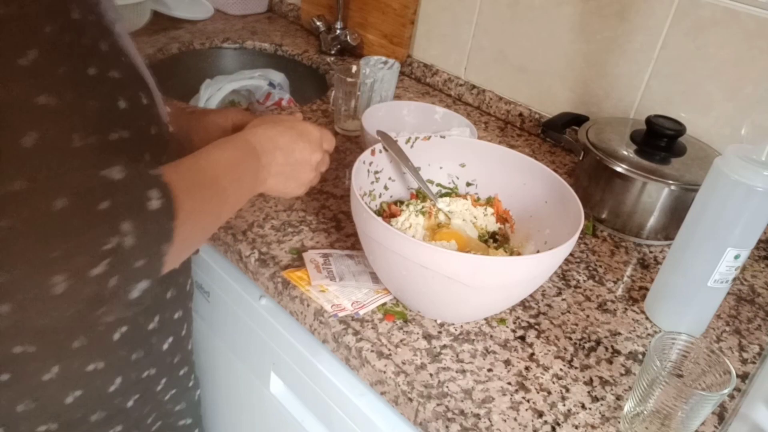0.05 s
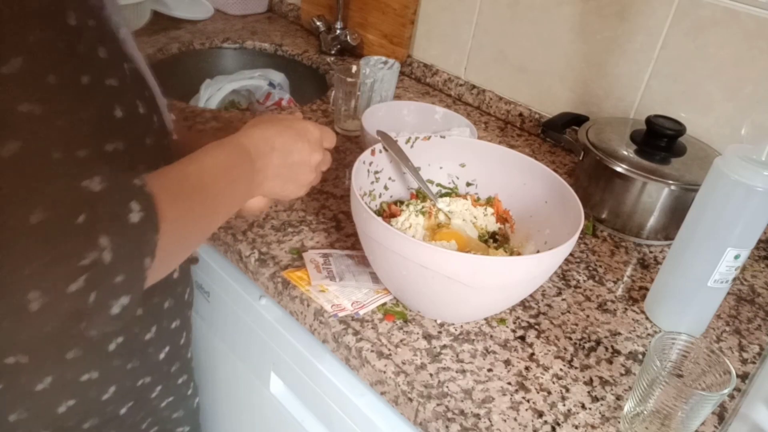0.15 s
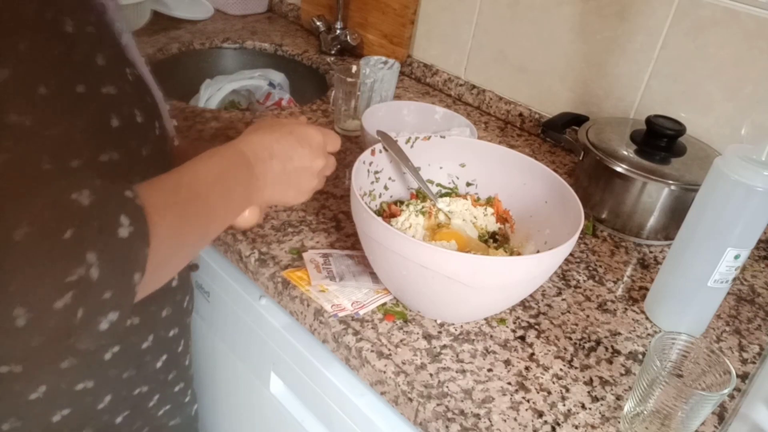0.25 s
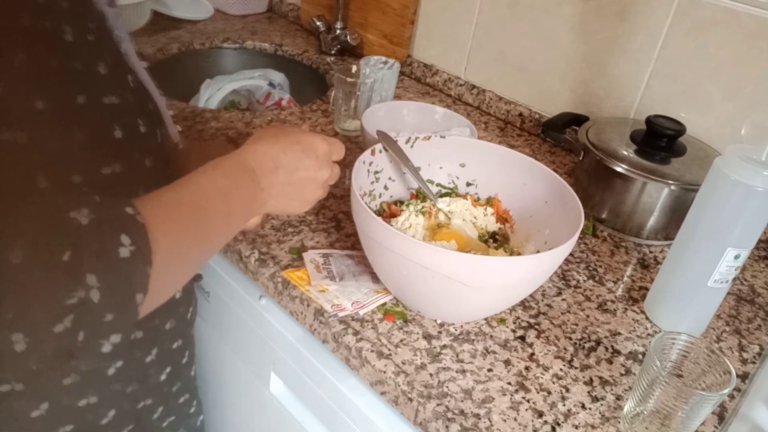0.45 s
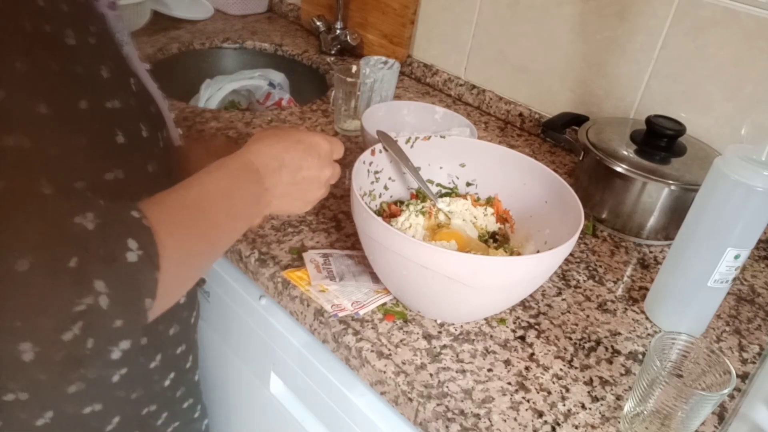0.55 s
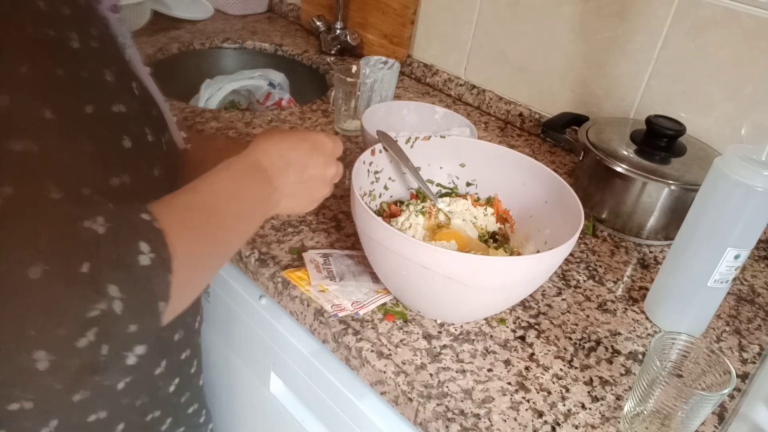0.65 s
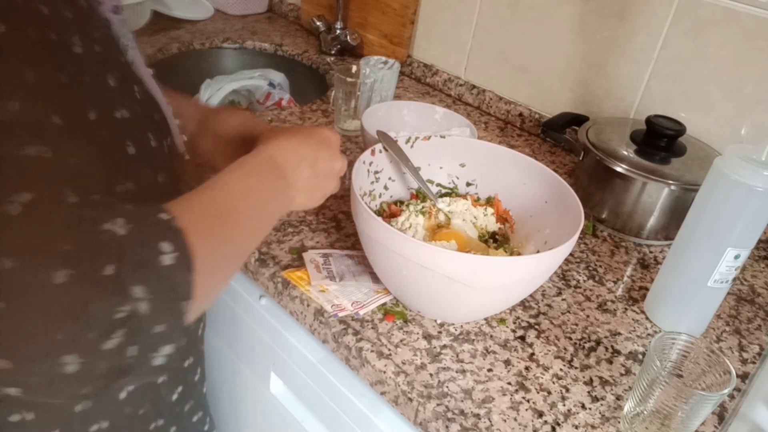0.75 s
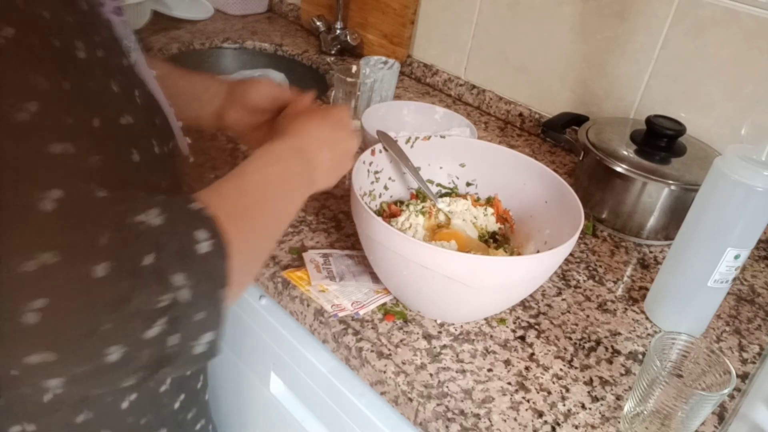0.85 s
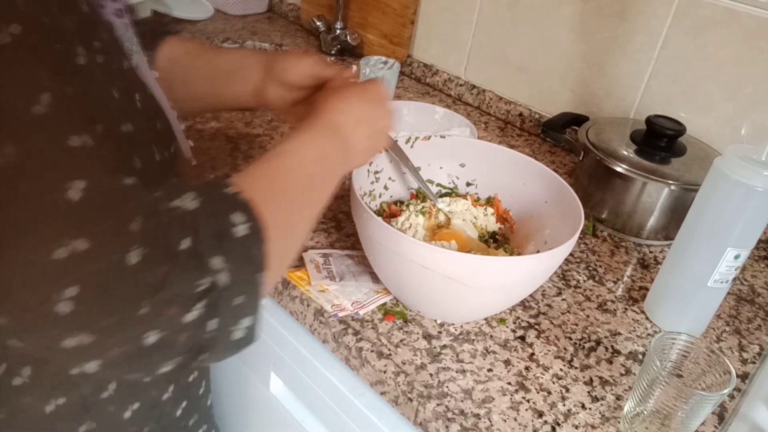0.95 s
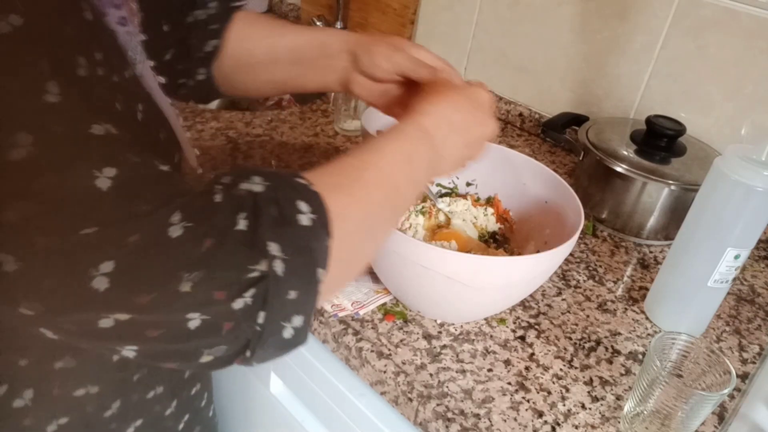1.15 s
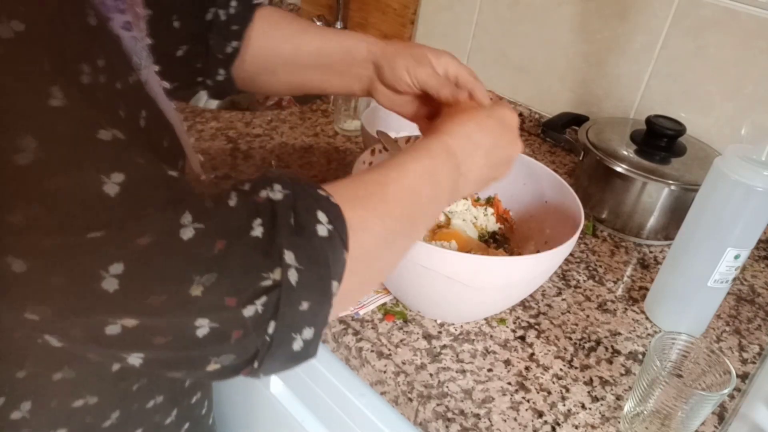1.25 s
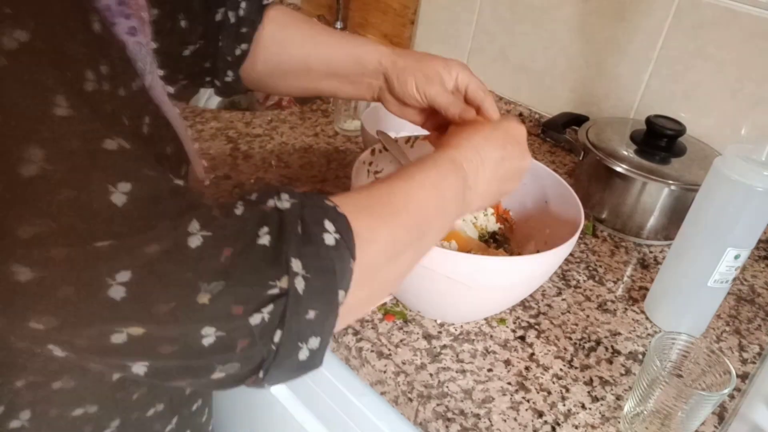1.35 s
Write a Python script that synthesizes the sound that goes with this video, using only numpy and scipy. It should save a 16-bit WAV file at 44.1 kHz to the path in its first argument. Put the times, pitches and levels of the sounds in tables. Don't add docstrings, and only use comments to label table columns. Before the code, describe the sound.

An egg creaks softly in the hand, then is knocked twice on a stone counter, crunching sharply with a short thud; faint shell clicks follow. Close microphone, small reflective tiled kitchen, faint hiss and hum.

```python
import sys
import numpy as np
from scipy import signal
from scipy.io import wavfile

SR = 44100
rng = np.random.default_rng(int(sys.argv[2]) if len(sys.argv) > 2 else 0)


def natural_amplitude(level_db):
    exponent = np.asarray(level_db, float) / 20
    return 10 ** exponent


def to_wav(sig):
    pcm = np.clip(np.atleast_2d(sig), -1, 1) * 32767
    pcm = np.round(pcm).astype(np.int16)
    wavfile.write(sys.argv[1], SR, pcm.T)


N = 61739
LEAD = 4410


def at_hz(points, hz):
    table_hz, values = np.array(points).T
    return np.interp(np.log(hz), np.log(table_hz), values)


def rms_one(x):
    return x / np.sqrt(np.mean(x ** 2) + 1e-30)


def band(x, low_hz, high_hz):
    sos = signal.butter(2, [low_hz, min(high_hz, .45 * SR)], "band", fs=SR, output="sos")
    return signal.sosfilt(sos, np.asarray(x) + 1e-18)


def bands():
    edges = 30 * 2 ** (np.arange(29) / 3)
    return [(low, high, np.sqrt(low * high)) for low, high in zip(edges, edges[1:])]


def drift(rate_hz):
    r = np.exp(-2 * np.pi * rate_hz / SR)
    noise = rng.standard_normal(N + LEAD + SR)
    return rms_one(signal.lfilter([1], [1, -2 * r, r * r], noise)[SR:])


def ring(clicks, hz, t60):
    r = natural_amplitude(-60 / (t60 * SR))
    w = 2 * np.pi * hz / SR
    return signal.lfilter([0, np.sin(w)], [1, -2 * r * np.cos(w), r * r], clicks + 1e-18)


def grains(start_s, length_s, per_s, spread_db):
    t = (np.arange(N + LEAD) - LEAD) / SR - start_s
    draw = rng.random(len(t))
    size = np.minimum(rng.exponential(1, len(t)), 3)
    sign = rng.choice([-1, 1], len(t))
    fade = (t >= 0) * np.exp(-np.maximum(t, 0) / length_s)
    run = (draw < per_s / SR) * sign * natural_amplitude(spread_db * size) * fade
    run[np.argmax(t >= 0)] = natural_amplitude(5)
    return run


# frequency in Hz, level in dB per Hz.
AIR_TONE = [(40, 6.5), (90, -2.5), (220, 3), (600, -1.5), (1440, -6.5), (3000, -15.5), (7000, -22.5),
            (15500, -30.5)]
AIR_DB, AIR_FLICKER_DB = -62, 1.78
HUM_HZ, HUM_WIDTH_HZ, HUM_DB = 101.3, 30, -71


def air():
    white = rng.standard_normal((3, N + LEAD))
    together = drift(2.4)
    hiss = 0
    for k, (low, high, hz) in enumerate(bands()):
        flicker_db = AIR_FLICKER_DB * (0.78 * together + drift(25.0))
        hiss = hiss + natural_amplitude(at_hz(AIR_TONE, hz) + flicker_db) * band(white[k % 2], low, high)
    hum = band(white[2], HUM_HZ - HUM_WIDTH_HZ / 2, HUM_HZ + HUM_WIDTH_HZ / 2)
    return natural_amplitude(AIR_DB) * rms_one(hiss) + natural_amplitude(HUM_DB) * rms_one(hum)


# start in
# seconds, level in dB, centre frequency in Hz, length in seconds.
CREAKS = [(-.03, -39.5, 2600, 0.07), (-.06, -33.5, 424, 0.05), (-.02, -50.5, 7800, 0.1),
          (-.02, -59.5, 14300, 0.13), (.118, -40.5, 2400, 0.033), (0.6268, -45, 7800, 0.018),
          (0.63, -43, 2770, 0.0084), (0.634, -53, 14100, 0.007), (0.76, -65, 13600, 0.0089),
          (0.865, -65, 14600, 0.012), (1.077, -45.5, 5160, 0.0023), (1.093, -57, 13000, 0.016),
          (1.095, -51.5, 7100, 0.022), (1.1786, -48.5, 7400, 0.0054), (1.179, -58, 13200, .004),
          (1.184, -43, 4350, 0.0037), (1.301, -56, 7500, .006), (1.368, -43.5, 4500, 0.011),
          (1.37, -50, 8700, 0.027), (1.376, -42, 4850, .005), (1.391, -25.5, 407, 0.0012),
          (-.05, -42, 1255, 0.17), (.627, -44.5, 5130, 0.012), (.628, -40.5, 1470, 0.016),
          (1.08, -49, 2400, 0.023), (1.18, -49, 4800, 0.0016), (1.369, -61, 14700, .04),
          (.28, -28, 89, 0.09), (0.931, -68, 8250, 0.3)]
CREAK_CLICKS_PER_S, CREAK_SPREAD_DB, CREAK_WIDTH_OCT = 2500, 3, .35


def creaks():
    width = 2 ** CREAK_WIDTH_OCT
    total = 0
    for start_s, db, hz, length_s in CREAKS:
        clicks = grains(start_s, length_s, CREAK_CLICKS_PER_S, CREAK_SPREAD_DB)
        total = total + natural_amplitude(db + 2.5) * band(clicks, hz / width, hz * width)
    return total


# start in seconds, level in dB.
FIRST_FRACTURES = [
    (.2373, -18),
    (.2388, -17),
    (.2412, -25.5),
    (.2428, -17.5),
    (.249, -20),
]
SECOND_FRACTURES = [
    (.4173, -37),
    (.4192, -16),
    (.4214, -17),
    (.4248, -15.5),
    (.4335, -43),
    (.4365, -21.5),
]
# frequency in Hz, level in dB per Hz.
FIRST_TONE = [(60, -37), (120, -1), (400, 0), (900, -3), (1500, -1), (3400, -6), (8000, -7.5), (15500, -24)]
SECOND_TONE = [(60, -35), (150, 1.5), (350, -2), (650, -9), (1300, -4.5), (4000, -12.5), (8000, -4.5),
               (15500, -15.5)]
# frequency in Hz, level in dB, t60 in seconds.
FIRST_MODES = [(116, -37, 0.5), (151, -26.5, 0.041), (385.8, -21.5, 0.13), (578, -25.5, 0.06),
               (800, -19.5, 0.029), (1313, -23, 0.11), (1507, -24, 0.076), (2110, -36, 0.056),
               (2700, -20, 0.042), (3210, -23.5, 0.073), (3650, -30.5, .08), (6640, -22.5, 0.023),
               (8440, -20, 0.0094)]
SECOND_MODES = [(116, -33, 0.12), (214.5, -27.5, 0.073), (402, -31, 0.18), (543, -35.5, 0.064),
                (805, -36, 0.078), (1266, -22.5, 0.1), (2115, -29.5, 0.042), (2400, -30, 0.045),
                (2790, -34, 0.05), (3566, -36.5, 0.09), (7800, -20.5, 0.0057), (9800, -55, .006)]
GRIT_PER_S, GRIT_DB, GRIT_S = 2100, -8, 0.011
THUD_LAG_S, THUD_BELOW_HZ, SHELL_ABOVE_HZ = 0.00469, 300, 5000
BLOW_TO_ROOM_DB = 4


def knock(fractures, tone, modes):
    clicks, blow = np.zeros((2, N + LEAD))
    for k, (start_s, db) in enumerate(fractures):
        clicks[LEAD + int(start_s * SR)] = natural_amplitude(db) * (-1) ** k
    first_s = fractures[0][0]
    top_db = max(db for _, db in fractures)
    blow[LEAD + int(first_s * SR)] = natural_amplitude(top_db)
    grit = grains(first_s + 0.00072, GRIT_S, GRIT_PER_S, 3.3)
    crunch = clicks + natural_amplitude(top_db + GRIT_DB) * grit

    broad = 0
    for k, (low, high, hz) in enumerate(bands()):
        broad = broad + natural_amplitude(at_hz(tone, hz) + 9.5) * band([crunch, blow], low, high) * (-1) ** k

    late_blow = np.roll(blow, int(THUD_LAG_S * SR))
    rings = 0
    for hz, db, t60 in modes:
        if hz < THUD_BELOW_HZ:
            striker = late_blow
        elif hz < SHELL_ABOVE_HZ:
            striker = blow
        else:
            striker = clicks
        rings = rings + natural_amplitude(db + 7) * ring(striker, hz, t60)
    return np.array([broad[0] + rings, natural_amplitude(BLOW_TO_ROOM_DB) * broad[1]])


# frequency in Hz, t60 in seconds.
TILE_T60 = [(100, 0.41), (220, 0.37), (450, 0.45), (900, .32), (1800, 0.33), (3880, .28), (8000, 0.23),
            (14000, 0.18)]
ROOM_DB, ROOM_BUILD_S, ROOM_BUILD_CYCLES = -23.5, 0.0045, 2.5


def kitchen(x):
    t = np.arange(SR // 2) / SR
    white = rng.standard_normal((2, len(t)))
    echo = 0
    for k, (low, high, hz) in enumerate(bands()):
        build = 1 - np.exp(-t / (ROOM_BUILD_S + ROOM_BUILD_CYCLES / hz))
        decay = natural_amplitude(-60 * t / at_hz(TILE_T60, hz))
        echo = echo + band(white[k % 2], low, high) * decay * build
    return natural_amplitude(ROOM_DB) * signal.fftconvolve(x, echo)[:len(x)]


def scene():
    first = knock(FIRST_FRACTURES, FIRST_TONE, FIRST_MODES)
    second = knock(SECOND_FRACTURES, SECOND_TONE, SECOND_MODES)
    creak_sends = creaks() * natural_amplitude([[0], [-7]])
    direct, to_room = first + second + creak_sends
    return (direct + kitchen(to_room) + air())[None, LEAD:]


def band_limit(x):
    return signal.sosfilt(signal.butter(12, 16600, fs=SR, output="sos"), x)


# centre frequency in Hz, width in Hz, gain in dB.
MIC_COLOUR = [(3540, 880, 6.5), (5080, 2300, -4), (7940, 740, 8)]


def record(dry):
    mix = signal.sosfilt(signal.butter(2, 72, "high", fs=SR, output="sos"), dry)
    for hz, width_hz, db in MIC_COLOUR:
        b, a = signal.iirpeak(hz, hz / width_hz, fs=SR)
        mix = mix + (natural_amplitude(db) - 1) * signal.lfilter(b, a, mix)
    mix = signal.sosfilt(signal.cheby2(12, 32, 15750, fs=SR, output="sos"), mix)
    return band_limit(mix)


dry = scene()
out = record(dry)
to_wav(out)
```